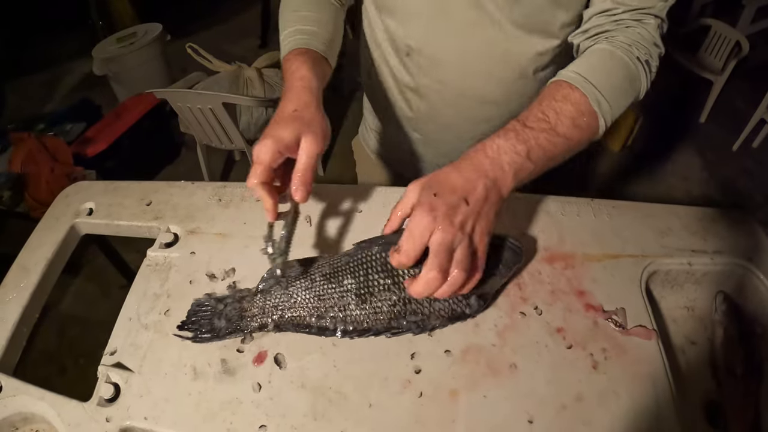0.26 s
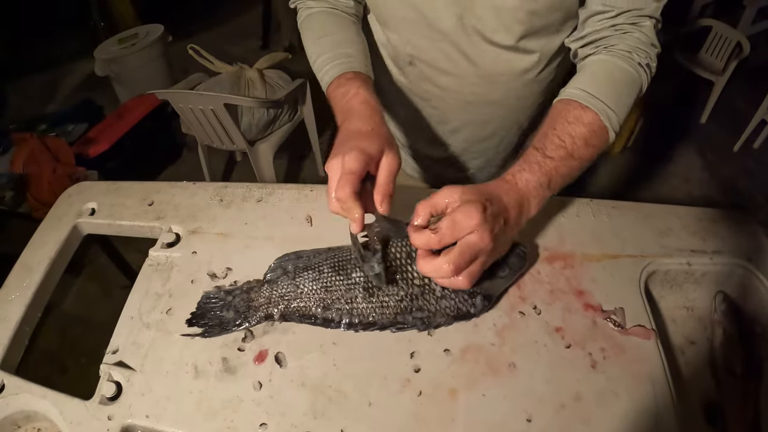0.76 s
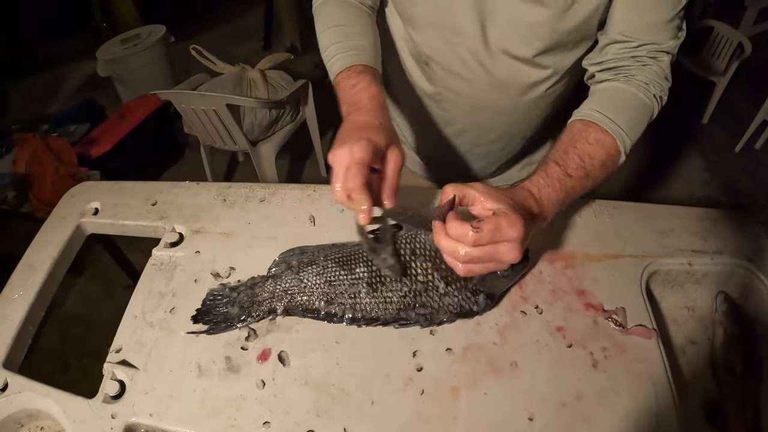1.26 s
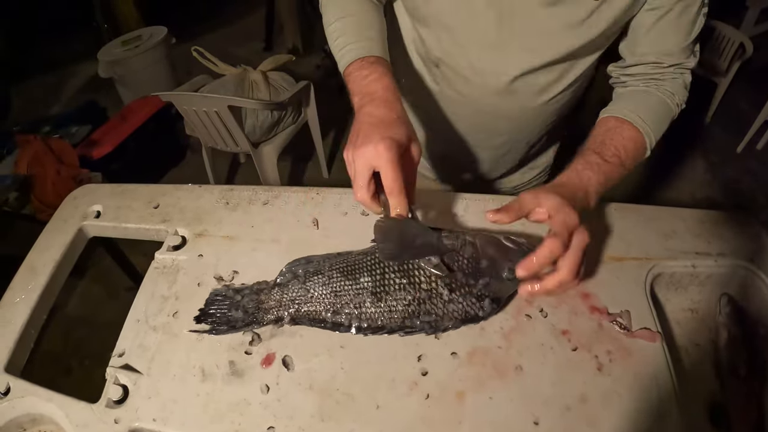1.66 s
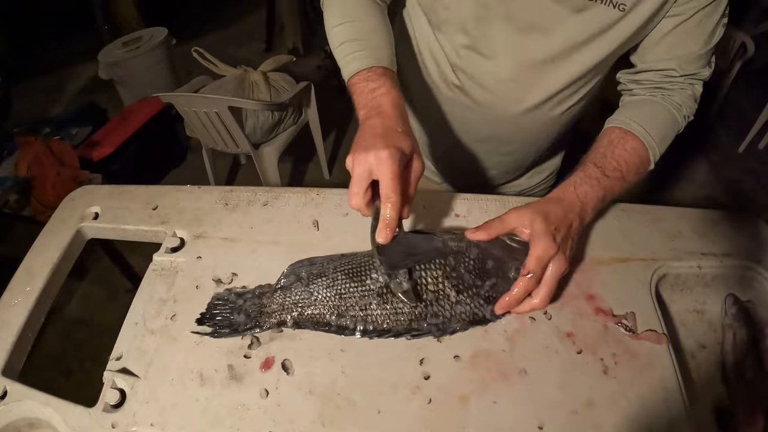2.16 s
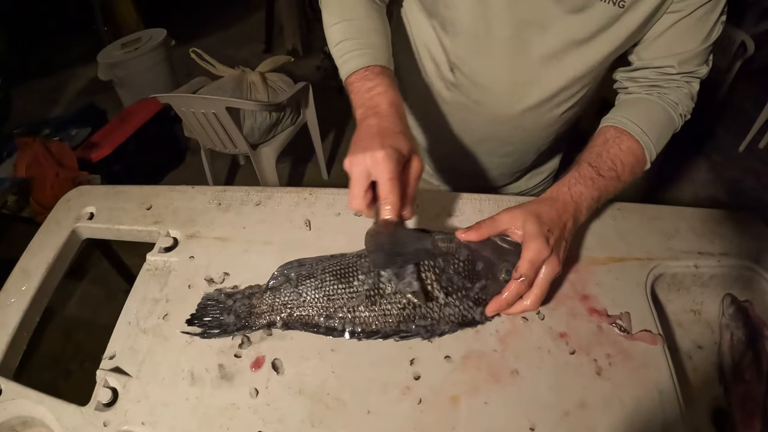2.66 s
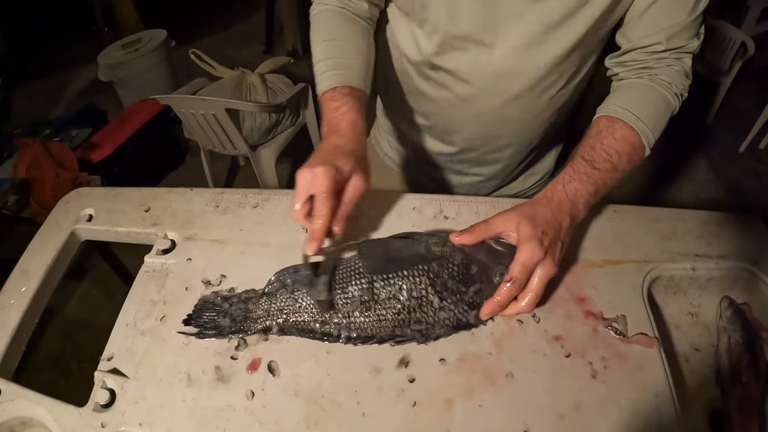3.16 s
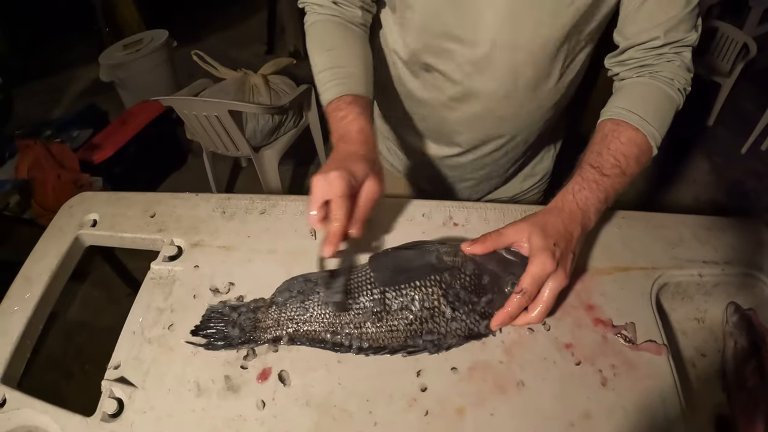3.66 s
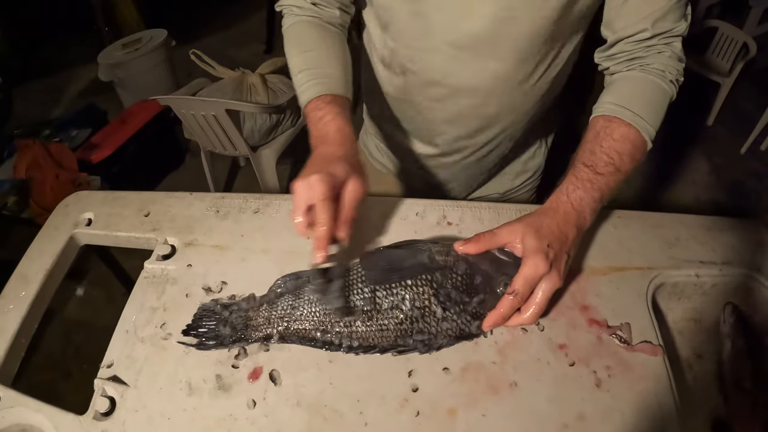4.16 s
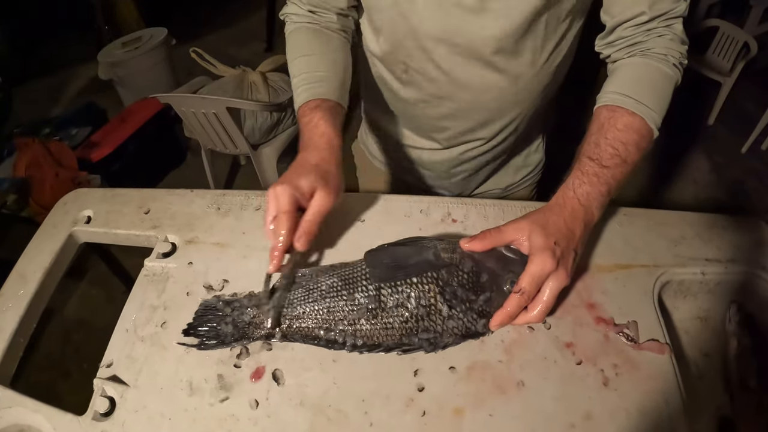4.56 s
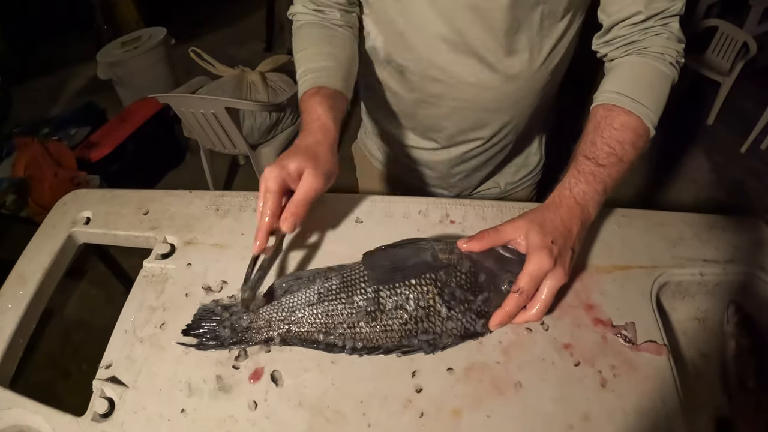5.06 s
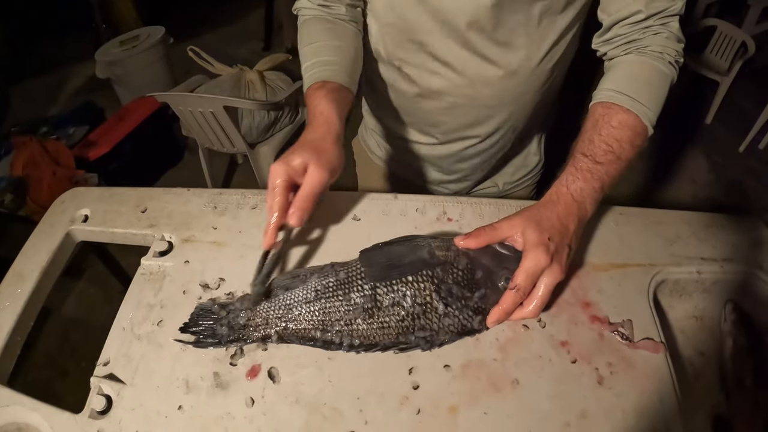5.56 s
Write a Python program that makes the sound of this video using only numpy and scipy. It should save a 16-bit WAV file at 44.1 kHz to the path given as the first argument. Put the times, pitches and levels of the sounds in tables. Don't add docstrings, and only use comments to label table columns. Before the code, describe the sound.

Very close, a metal fish scaler gives one harsh rasp, then mostly faint taps and light ringing rubs during two lulls. From about 2.3 seconds quick back-and-forth scraping runs steadily, scales clicking off and the hollow plastic table knocking and droning. It ends with four separate strokes. Small dry space, faint hiss, close stereo microphones.

```python
import sys
import numpy as np
from scipy import signal
from scipy.fft import rfft, irfft
from scipy.io import wavfile
from scipy.ndimage import uniform_filter1d

SR = 44100
rng = np.random.default_rng(int(sys.argv[2]) if len(sys.argv) > 2 else 0)


def digitize_waveform(pressure):
    field = np.atleast_2d(pressure).T
    bounded = np.clip(field, -1, 1)
    quanta = np.round(bounded * 32767).astype(np.int16)
    wavfile.write(sys.argv[1], SR, quanta)


def undo_db(level):
    steps = np.asarray(level, float) / 20
    return 10 ** steps


N = 256662

# (start [s], length [s], early level [dB], late level [dB], frame re head [dB])
LIFTS = [(0.0, 0.075, -16, -29.5, 1), (2.318, 0.044, -23, -19.5, 0.5), (2.592, 0.067, -18, -26.5, 3),
         (2.8, 0.064, -19, -23.5, 4.5), (3.089, 0.095, -21, -20, 3.5), (3.353, 0.078, -24, -16.5, 4.5),
         (3.579, 0.0654, -25.5, -15, 5), (3.79, 0.074, -28, -18.5, 5.5), (4.025, .07, -22.5, -19.5, 4.5),
         (4.262, 0.088, -21, -22.5, 2.5), (4.505, 0.085, -17, -21.5, 0), (4.731, 0.069, -16, -18, -1)]
# (start [s], length [s], early level [dB], late level [dB], frame re head [dB])
SWEEPS = [
    (4.994, 0.058, -22, -19, -3.5),
    (5.274, 0.065, -19, -21.5, -5),
    (5.509, 0.066, -21, -20, -5),
    (5.775, 0.066, -25.5, -13, -4),
]
# (time [s], peak [dB])
SNAPS = [(0.0242, -5), (0.0288, -4), (0.0535, -3), (1.3581, -8.5), (1.4847, -14), (2.1053, -13),
         (2.3297, -7), (2.3695, -4.5), (2.607, -14), (2.6513, -4), (2.6634, -3.5), (2.8027, -18),
         (2.8331, -5), (2.9807, -19), (3.1044, 1.5), (3.147, -4), (3.3762, -4), (3.3945, -3),
         (3.5967, -3.5), (3.6511, -15), (3.809, -7), (3.8149, -2), (3.8386, -6), (4.0512, -1.5),
         (4.0854, -6), (4.284, -3), (4.3184, -11), (4.53, -7), (4.5624, -4), (4.755, -8)]
# (time [s], peak [dB])
TAIL_SNAPS = [(5.0104, 0), (5.0863, -14), (5.0964, -8.5), (5.2814, -2.5), (5.2975, -3), (5.3464, -9),
              (5.519, -8), (5.5325, -9), (5.5557, -10), (5.5656, -6.5), (5.796, -18)]
# (time [s], drone level [dB])
LEAN = [(0.0, -33), (0.41, -39.5), (1.0, -40.5), (1.45, -31), (1.75, -37), (2.07, -35), (2.5, -33),
        (2.7, -27.5), (3.0, -30), (3.3, -33.5), (3.55, -32.5), (3.7, -32), (3.9, -31), (4.2, -39),
        (4.55, -37), (4.9, -35.5), (5.3, -36), (5.82, -36.5)]


def evened(x, span=None):
    if span is None:
        power = np.mean(x ** 2)
    else:
        power = uniform_filter1d(uniform_filter1d(x ** 2, span), span)
    return x / np.sqrt(abs(power) + 1e-20)


def wander(span):
    return evened(uniform_filter1d(uniform_filter1d(rng.standard_normal(N), span), span))


def follow(points, t):
    return np.interp(t, *np.transpose(points))


def read(points, hz):
    f, value = np.transpose(points)
    return np.interp(np.log(hz + 1), np.log(f + 1), value)


def resonate(x, hz, width):
    turn = np.exp(2j * np.pi * np.cumsum(hz * np.ones(len(x))) / SR)
    r = np.exp(-np.pi * width / SR)
    once = signal.lfilter([1 - r], [1, -r], x / turn)
    twice = signal.lfilter([1 - r], [1, -r], once)
    return (turn * twice).real / np.sqrt(width)


def body(x, modes, bend=0.95, patchy_db=0):
    out = 0
    for k, (hz, width, db) in enumerate(modes):
        drive = x * undo_db(db + patchy_db * wander(500))
        out = out + (-1) ** k * resonate(drive, hz * bend, 1.487 * width)
    return out


def stroke(t, row, kind):
    # (time [s], teeth level [dB])
    tip = [(0.0, -6), (.05, -2), (.8, 0.5), (1.1, -6.5), (1.3, -0.5), (1.45, 6.5), (1.65, -10), (2.0, 1),
           (2.5, -2.5), (2.9, -3), (3.3, 0), (3.8, 2), (4.2, 3.5), (4.6, -0.5), (4.95, -6), (5.1, 9),
           (5.3, 2.5), (5.82, 1)]
    start, length, early_db, late_db, frame_db = row
    end = start + length
    bite_at = start - kind["rise_s"]
    let_go = end + kind["release_s"]
    times = [bite_at - kind["land_s"], bite_at, start, start + length / 2, end, let_go, let_go + kind["drag_s"]]
    land_db = early_db + kind["land_db"]
    middle_db = (early_db + late_db) / 2 + kind["sag_db"]
    drag_db = late_db + kind["drag_db"]
    shape_db = [land_db - 4.5, land_db, early_db, middle_db, late_db, drag_db, drag_db - 4.5]
    rasp_db = np.interp(t, times, shape_db, left=-120, right=-120)
    frame_db = frame_db + np.interp(t, [start, end], kind["frame_db"])
    teeth_db = np.interp(t, [start, end], kind["teeth_db"]) + follow(tip, t)
    knock_db = np.interp(t, [start, end], kind["knock_db"]) + 0.55 * (follow(LEAN, t) + 32.5)
    head_db = rasp_db - 10 * np.log10(1 + undo_db(2 * frame_db) + undo_db(2 * teeth_db))
    return [head_db, head_db + frame_db, head_db + teeth_db, rasp_db + knock_db, rasp_db + kind["push_db"]]


def controls():
    # (start [s], length [s], early level [dB], late level [dB], frame re head [dB])
    returns = [(.138, .03, -24.5, -31, -1), (2.47, 0.066, -28.5, -29, 3), (2.708, 0.056, -30, -23, 1.5),
               (2.93, 0.12, -22.5, -27, -4), (3.229, 0.076, -20, -19, 0), (3.482, 0.062, -20, -19.5, -3.5),
               (3.7, 0.053, -19.5, -18.5, 0), (3.909, 0.086, -19.5, -26, 2.5), (4.148, 0.1, -17, -32, -1.5),
               (4.422, 0.028, -19, -26, 1.5), (4.62, 0.067, -36, -30.5, -3)]
    # (start [s], length [s], early level [dB], late level [dB], frame re head [dB])
    touches = [(.775, 0.0055, -36, -54, 8), (.812, .012, -41, -37.5, -4), (.862, 0.0075, -30, -34, 2),
               (1.356, .01, -34.5, -29, 3), (1.438, 0.019, -27.5, -37.5, -1), (1.474, 0.015, -25.5, -27, 3),
               (1.598, .012, -33, -39, 10), (1.638, 0.019, -24.5, -25.5, -1.5),
               (2.078, 0.027, -22.5, -25, 9), (2.297, 0.0086, -25.5, -45, 0),
               (4.387, 0.08, -27.5, -27.5, -0.5), (4.984, .01, -34, -28, -4), (5.075, 0.027, -31, -32, -3),
               (5.252, .02, -32, -28, -6), (5.595, 0.016, -33, -27, 1.5)]
    # (start [s], length [s], early level [dB], late level [dB], frame re head [dB])
    rubs = [(.19, 0.041, -64, -39.5, 7), (.78, .11, -50, -60, 2), (1.005, 0.19, -42, -36.5, 1.5),
            (1.275, 0.027, -34, -35.5, -4), (1.325, 0.032, -42, -39, 4), (1.5, 0.072, -55, -42, 12),
            (1.61, 0.059, -37, -45, -3), (1.845, 0.07, -36, -38, 7), (1.925, 0.074, -29, -31.5, 10),
            (2.05, 0.022, -38, -42, 11), (2.12, 0.036, -53, -48, 5), (2.435, 0.052, -32, -36, 10)]
    lift = dict(rows=LIFTS, land_s=0.018, land_db=-16, rise_s=0.0047, sag_db=-1,
                release_s=0.014, drag_db=-19, drag_s=0.028, frame_db=(-2.5, 1.5),
                teeth_db=(-1.5, -0.5), knock_db=(-16, -6), bite_db=-1.5, push_db=-6)
    glide_back = dict(rows=returns, land_s=0.016, land_db=-10, rise_s=0.0027, sag_db=3,
                      release_s=0.0043, drag_db=-38, drag_s=0.014, frame_db=(1, -0.5),
                      teeth_db=(-4, -1.5), knock_db=(-10.5, -15.5), bite_db=-9.5, push_db=-14.5)
    sweep = dict(rows=SWEEPS, land_s=0.0049, land_db=-28, rise_s=0.012, sag_db=1,
                 release_s=0.0074, drag_db=-10.5, drag_s=0.028, frame_db=(-6, -3),
                 teeth_db=(-8, -8.5), knock_db=(-9, -12), bite_db=2, push_db=-7.5)
    touch = dict(rows=touches, land_s=0.0057, land_db=-16, rise_s=0.0018, sag_db=1.6,
                 release_s=0.012, drag_db=-28, drag_s=0.019, frame_db=(-2.5, -1.5),
                 teeth_db=(-4, -0.5), knock_db=(-10.5, -6.5), bite_db=-4, push_db=-3)
    rub = dict(rows=rubs, land_s=0.024, land_db=-16, rise_s=0.0075, sag_db=-1.9,
               release_s=0.015, drag_db=-19, drag_s=0.015, frame_db=(2, -9.5),
               teeth_db=(6, -4), knock_db=(-8.5, -12.5), bite_db=-13.5, push_db=0)
    t = np.arange(N) / SR
    levels_db, bite_db = np.full((5, N), -120.), np.zeros(N)
    for kind in (lift, glide_back, sweep, touch, rub):
        for row in kind["rows"]:
            near = slice(max(round((row[0] - 0.1) * SR), 0), round((row[0] + row[1] + 0.1) * SR))
            new_db = np.array(stroke(t[near], row, kind))
            bite_db[near] = np.where(new_db[0] > levels_db[0, near], kind["bite_db"], bite_db[near])
            levels_db[:, near] = np.maximum(levels_db[:, near], new_db)
    lumpy_db, swell_db, swell_s = 2, 4, 0.0017
    swell = sum(np.exp(-((t - s) / swell_s) ** 2) for s, db in SNAPS + TAIL_SNAPS)
    levels_db[:4] += lumpy_db * wander(250) + swell_db * np.minimum(swell, 1)
    fall_db = t * 830.0
    levels_db = np.maximum.accumulate(levels_db + fall_db, axis=1) - fall_db
    return uniform_filter1d(undo_db(levels_db), 150, axis=1), uniform_filter1d(undo_db(bite_db), 200)


def catches(per_s, uneven, spread_db, burst_s, rub):
    pace = evened(uniform_filter1d(rng.standard_normal(N), 200))
    steps = np.cumsum(per_s * np.exp(uneven * pace)) / SR
    caught = np.diff(np.floor(steps), prepend=0) > 0
    size = undo_db(spread_db * rng.standard_normal(N)) * caught
    bursts = signal.lfilter([1], [1, -np.exp(-1 / (burst_s * SR))], size)
    grit = rng.standard_normal(N) * undo_db(4.14 * rng.standard_normal(N))
    return (evened(bursts) + rub) * evened(grit)


def scaler(gains, bite):
    # (frequency [Hz], width [Hz], level [dB])
    head = [(1848, 130, 5), (2060, 98, 10), (2127, 52, -29.5), (2525, 110, 0)]
    frame = [(3150, 590, 7), (3404, 430, 10.5), (3530, 230, -2), (3936, 200, 1.5)]
    teeth = [(5064, 310, 2.5), (5470, 155, 2.5), (6190, 840, 0.5), (6620, 59, -6), (7400, 350, -5.5),
             (9210, 330, -11.5), (10870, 2200, -4.5)]
    # (frequency [Hz], width [Hz], level [dB])
    scales = [
        [(2410, 452, 0)],
        [(3380, 1670, 0)],
        [(5670, 3130, -1), (9640, 3500, -4)],
    ]
    # (frequency [Hz], width [Hz], level [dB])
    knock_modes = [(188.5, 88, 10.5), (303.7, 81, 1), (434, 58, 3), (598, 47, -4.5), (766, 84, -5),
                   (1007, 81, -5.5), (1400, 20, -35)]
    # (frequency [Hz], width [Hz], level [dB])
    spatter = [(13400, 1200, 0)]
    # (time [s], main ring [Hz])
    grip_points = [
        (0.0, 2060),
        (0.48, 2040),
        (1.49, 2194),
        (1.72, 2310),
        (1.96, 2094),
        (3.11, 2090),
        (3.45, 2130),
        (4.41, 2060),
        (4.96, 2250),
        (5.82, 2154),
    ]
    # (time [s], lowest frame ring [Hz])
    flex_points = [
        (0.0, 3090),
        (1.4, 3110),
        (1.6, 3160),
        (1.9, 3420),
        (2.15, 3380),
        (2.3, 2960),
        (3.5, 3035),
        (4.9, 3010),
        (5.2, 3280),
        (5.82, 3020),
    ]
    glide = catches(per_s=200, uneven=0.5, spread_db=6.0, burst_s=0.0019, rub=0.92)
    lift = catches(per_s=230, uneven=0.5, spread_db=6.5, burst_s=0.00089, rub=0.59)
    t = np.arange(N) / SR
    grip = follow(grip_points, t) / head[1][0]
    flex = follow(flex_points, t) / frame[0][0]
    bends = [grip, flex + 0.008 * wander(3000), 1 + 0.008 * wander(3000)]
    tool = 0
    for gain, modes, wide, bend in zip(gains, (head, frame, teeth), scales, bends):
        ring = evened(body(glide + 0.15 * bite * lift, modes, bend, patchy_db=3.0), span=700)
        scrape = evened(body(lift, wide, patchy_db=3.5), span=700)
        tool = tool + gain * (ring + bite * scrape) / np.sqrt(1 + bite ** 2)
    knock = gains[3] * evened(body(lift, knock_modes, patchy_db=3.5), span=900)
    spray = []
    for side in "LR":
        drops = body(abs(lift) * rng.standard_normal(N), spatter)
        spray.append(gains[2] * np.sqrt(bite) * evened(drops, span=500))
    return undo_db(-2.97) * tool, undo_db(1.5) * knock, undo_db(-25.5) * np.array(spray)


def table(push):
    # (frequency [Hz], width [Hz], level [dB])
    drone = [(100, 71, -14), (126.5, 26.8, 2.5), (176.8, 31, -6.5), (242, 69, -9.5)]
    lag_s, smooth_s = 0.023, 0.083
    t = np.arange(N) / SR
    late = np.interp(t - lag_s, t, uniform_filter1d(push, round(smooth_s * SR)))
    hum = evened(body(rng.standard_normal(N), drone), span=2500)
    return hum * np.hypot(undo_db(follow(LEAN, t)), late)


def snaps(events, centre_hz, gain_db, edge, fade_s=0.00019, ring_db=-19):
    out, u = np.zeros((2, N + 500)), (np.arange(400) - 40) / SR
    grits = rng.standard_normal((len(events), 400))
    places = rng.uniform(-0.76, 1, (len(events), 2))
    for (s, db), grit, (side, size) in zip(events, grits, places):
        hz = centre_hz * undo_db(1.65 * size)
        for k, lean in enumerate((side, -side)):
            v = u - lean * 0.00002
            shape = np.cos(2 * np.pi * hz * v) + edge * np.cos(2 * np.pi * 1.95 * hz * v)
            click = shape * np.exp(-(v / np.where(v < 0, fade_s / 2, fade_s)) ** 2)
            ring = undo_db(ring_db) * (grit - np.roll(grit, shift=3)) * np.exp(-abs(u) / 0.0013) * (u > 0)
            out[k, round(s * SR):][:400] += undo_db(db + gain_db + 1.5 * lean) * (click + ring)
    return out[:, 40:N + 40]


def small_snaps(count=1):
    small_db, spread_db = -19.5, 5.5
    rows = np.array(LIFTS + SWEEPS)
    place, size = rng.random((len(rows), count)), rng.standard_normal((len(rows), count))
    s = np.minimum(rows[:, :1] + rows[:, 1:2] * place, N / SR)
    stroke_db = rows[:, 2:4].mean(1)[:, None]
    peak_db = stroke_db + 20 + small_db + spread_db * size
    return list(zip(s.ravel(), peak_db.ravel()))


def landings():
    # (time [s], peak [dB])
    drops = [(0.3346, -41), (0.374, -43), (0.5716, -39.5), (0.5804, -43), (0.7233, -37), (0.8116, -25),
             (0.8395, -44), (1.2645, -33), (1.3224, -30), (1.5988, -26), (1.736, -43), (1.7659, -18.5),
             (5.23, -31), (5.4755, -32), (5.6865, -29), (5.7399, -32.5)]
    return snaps(drops, centre_hz=6200, gain_db=-6, edge=0, fade_s=0.0004, ring_db=-8)


def room(x):
    # (frequency [Hz], level [dB])
    walls = [(60, -24), (150, -11), (500, 10), (2000, 6), (8000, -2), (13000, 7)]
    # (frequency [Hz], time [s])
    decay = [(200, 0.079), (2000, 0.21), (6000, 0.33), (14000, 0.2)]
    taps = np.zeros((2, SR // 2))
    at = np.arange(80, SR // 2 - 20, 20)
    at = at + rng.integers(0, 20, (2, len(at)))
    np.put_along_axis(taps, at, rng.choice([-1., 1.], at.shape), 1)
    hz, t, z = signal.stft(taps, SR, nperseg=256)
    fade_db = read(walls, hz)[:, None] - 60 * t / read(decay, hz)[:, None]
    tail = signal.istft(z * undo_db(fade_db), SR, nperseg=256)[1]
    return signal.fftconvolve(x[None], tail / np.linalg.norm(tail[0]), axes=1)[:, :N]


def air():
    # (frequency [Hz], level per Hz [dB])
    hiss_curve = [(180, -46), (300, 2.5), (411, 2), (877, -8.5), (1940, -11.5), (2250, -14), (7370, -28),
                  (12300, -43), (15500, -65)]
    # (frequency [Hz], width [Hz], level [dB])
    fuzzy = [(1363, 380, 3.5), (2085, 280, 2.5), (2680, 92, -3), (4680, 150, -7.5), (5640, 280, -13)]
    air_db = -46
    a, b = rfft(rng.standard_normal((2, N)))
    z = np.array([a, 0.68 * a + 0.56 * b]) * undo_db(read(hiss_curve, np.fft.rfftfreq(N, 1 / SR)))
    bands = evened(body(rng.standard_normal(N), fuzzy, patchy_db=1.5))
    return undo_db(air_db - 3.5) * evened(irfft(z, N)) + undo_db(air_db - 9.0) * bands


def scene():
    gains, bite = controls()
    tool, knock, spray = scaler(gains, bite)
    flicks = snaps(SNAPS + TAIL_SNAPS + small_snaps(), centre_hz=4330, gain_db=-0.5, edge=0.18)
    flicks = flicks + landings()
    low = knock + table(gains[4])
    sway = undo_db(-30) * table(gains[4]) * np.array([[1], [-1]])
    echo = undo_db(-9.5) * room(tool + flicks.mean(0) + low)
    return tool + spray + flicks + low + sway + echo + air()


def roll_off(x):
    return signal.sosfilt(signal.butter(12, 15710, fs=SR, output="sos"), x)


def record(dry):
    # (frequency [Hz], level [dB])
    mic = [(20, -20), (45, -7.5), (80, 0), (11000, 2), (13500, 0.5), (15600, -12), (17000, -40)]
    # (frequency [Hz], level [dB])
    right_colour = [(100, 0.3), (1500, 0.54), (6000, 0.8), (9000, -1), (14000, -2.5)]
    ceiling = 0.85
    hz = np.fft.rfftfreq(N, 1 / SR)
    left = np.exp(-2j * np.pi * hz * 0.7 / SR)
    right = undo_db(read(right_colour, hz))
    pair = np.array([left, right]) * undo_db(read(mic, hz))
    rounded = ceiling * np.tanh(dry / ceiling)
    return roll_off(irfft(rfft(rounded) * pair, N))


dry = scene()
out = record(dry)
digitize_waveform(out)
```